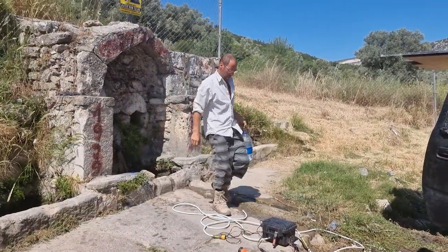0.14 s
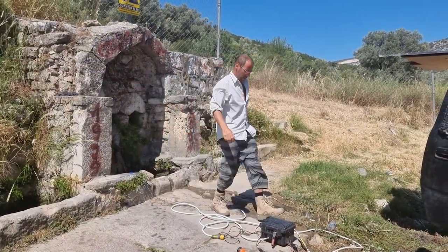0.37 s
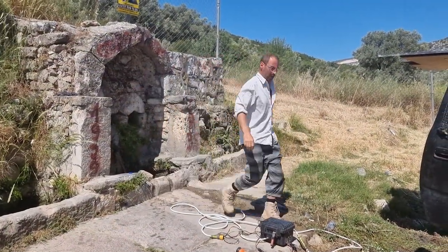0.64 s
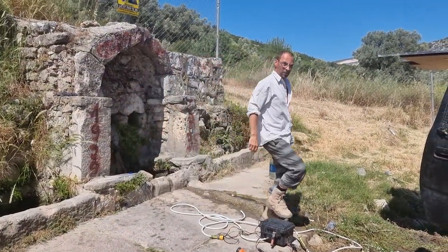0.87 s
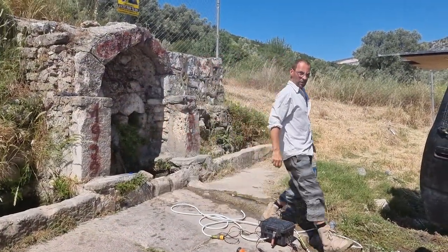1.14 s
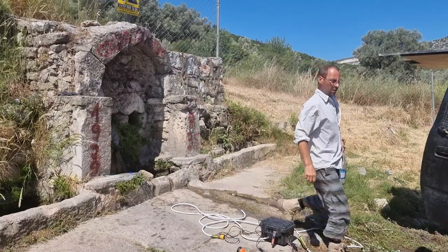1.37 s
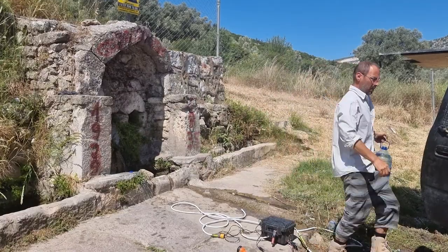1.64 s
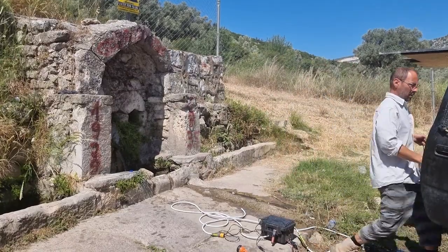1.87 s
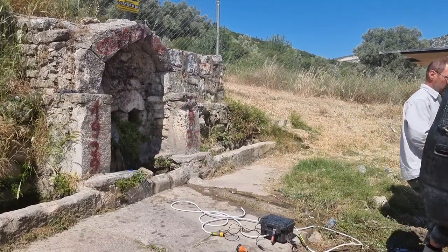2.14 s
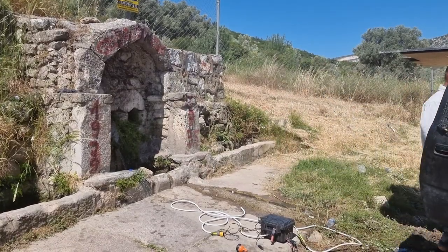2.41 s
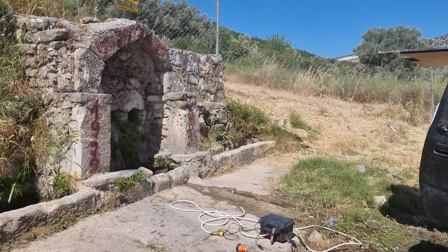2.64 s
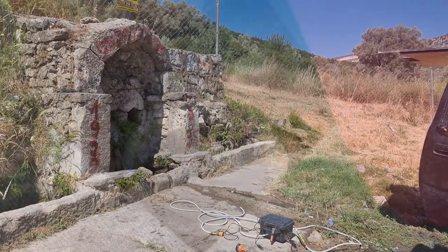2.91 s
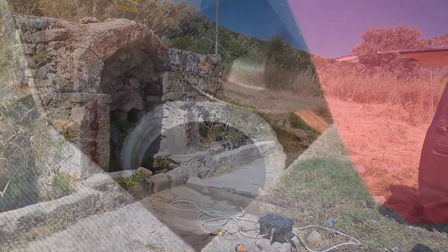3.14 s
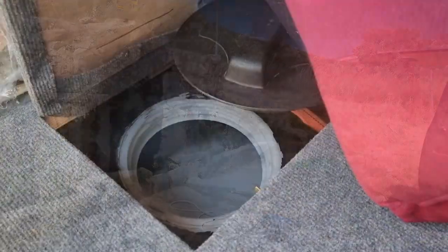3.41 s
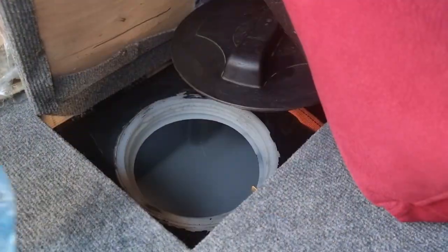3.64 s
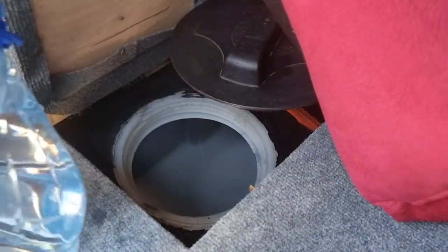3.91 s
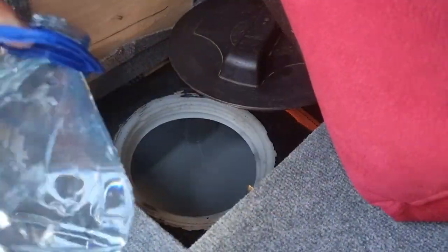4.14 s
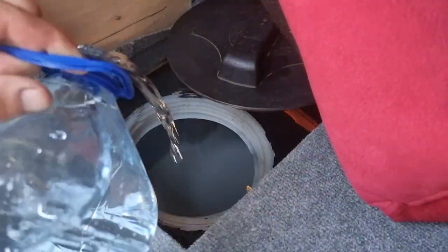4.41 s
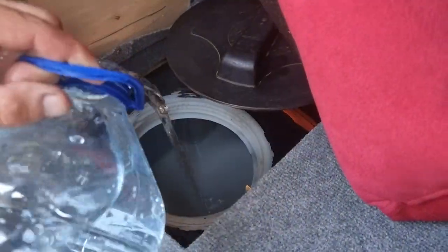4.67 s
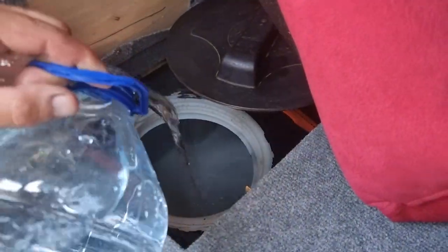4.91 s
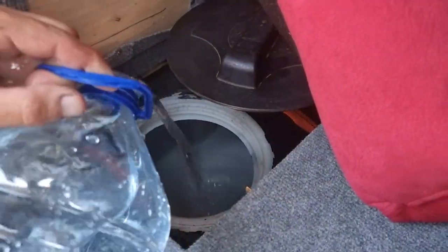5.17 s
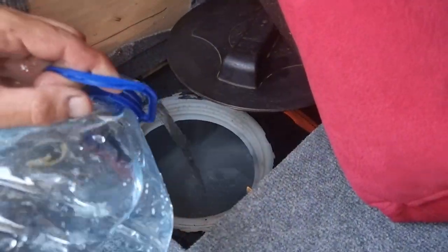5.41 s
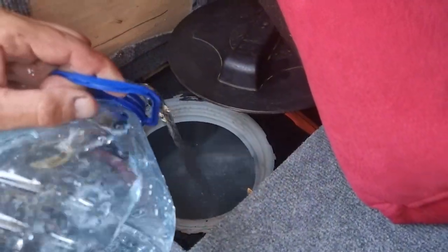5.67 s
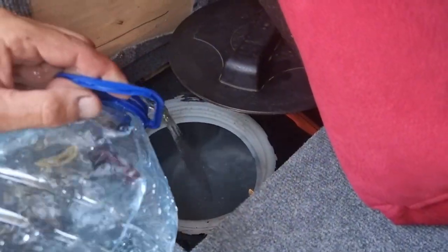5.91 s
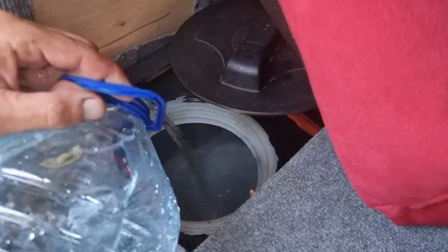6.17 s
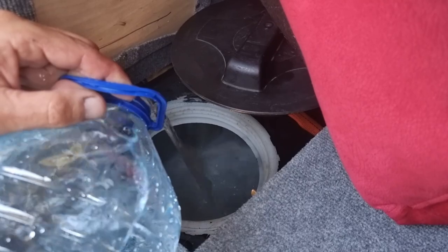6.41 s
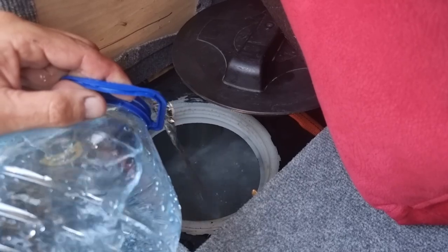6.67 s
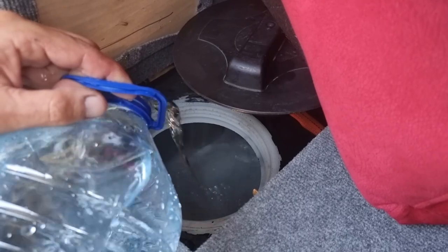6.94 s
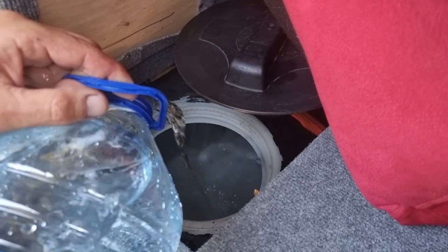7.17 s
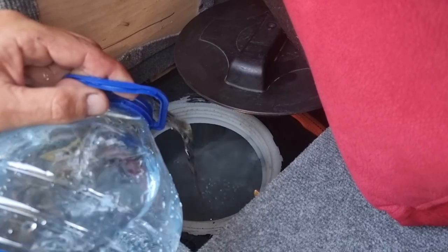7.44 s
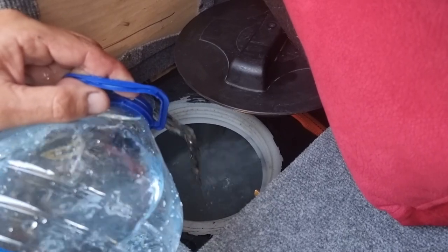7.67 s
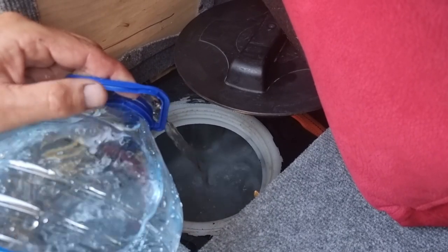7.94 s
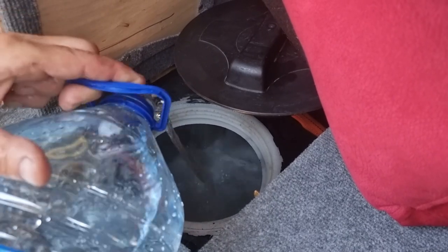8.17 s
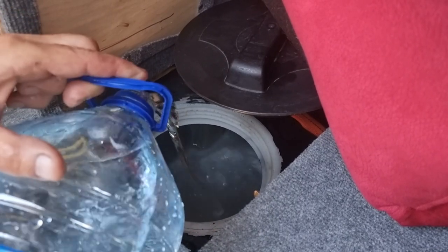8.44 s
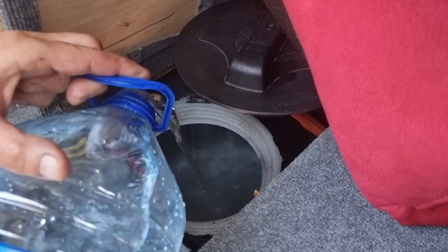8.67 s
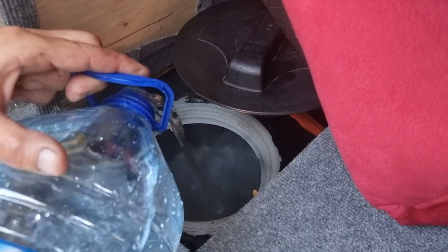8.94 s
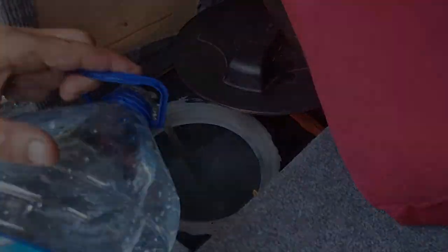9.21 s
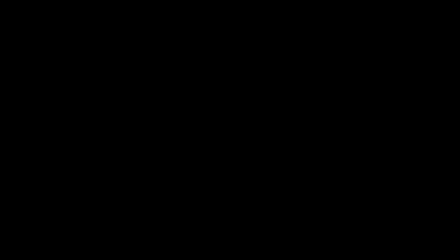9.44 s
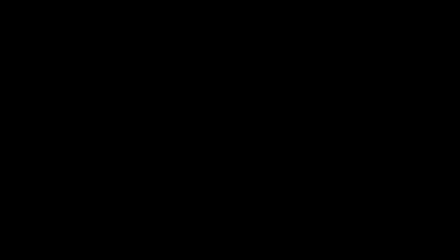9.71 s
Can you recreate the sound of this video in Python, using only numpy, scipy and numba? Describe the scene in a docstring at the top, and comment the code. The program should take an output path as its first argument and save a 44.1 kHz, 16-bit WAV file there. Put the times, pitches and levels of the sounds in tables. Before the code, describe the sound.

Outdoors, a thin spring trickles and bubbles into a stone trough while someone walks past with soft crunches and dull knocks; wind rumbles and thumps on the stereo microphone. After a blink of silence, close inside a van, a full plastic bottle sloshes and pops, then water gurgles in surges into a half-full tank, hissing, splashing and booming. One very loud plastic crack cuts through early in the pour.

```python
"""Inside a van, water plunges and pours in surges into a half-full tank: bubbles and churned noise ring its
modes, drops hiss above, and noise drives the booming, ringing air space. Before the pour a full plastic bottle
is lifted and sloshes; it pops then and during the pour, its buckling wall ringing in many damped sines. Ahead
of that, outdoors, a spring trickles (bubbles and noise) into a stone trough and someone walks past: dull knocks,
crunching noise. A short silence parts the places. Filtered noise is the wind on the two microphone ports."""
import sys
import numpy as np
from scipy import signal
from scipy.fft import rfft, irfft
from scipy.io import wavfile
from scipy.ndimage import uniform_filter1d
from numba import njit

SR = 44100
rng = np.random.default_rng(int(sys.argv[2]) if len(sys.argv) > 2 else 0)


def persist_wave(psi):
    """Save psi, clipped to +-1, as 16-bit WAV."""
    counts = np.round(np.clip(psi, -1, 1) * 32767).astype(np.int16)
    wavfile.write(sys.argv[1], SR, np.atleast_2d(counts).T)


def volts_from_db(level):
    """Convert decibel levels to linear amplitude ratios."""
    exponent = np.asarray(level, float) / 20
    return 10 ** exponent


N = 433062
PORTS = np.array([[1], [-1]])  # left, right
BREAK_START_S, BREAK_END_S = 3.583, 3.597  # silence between trough and van
POUR_START_S = 4.55

# Strength of the water in each place: time_s, froth_level_db
SPRING_FLOW = [(0, -55.5), (.85, -57.5), (1.05, -56.5), (1.25, -61.5), (1.35, -53.5), (1.6, -56.5),
               (2.75, -57), (2.95, -54), (3.58, -56)]
SLOSH_FLOW = [(3.6, -55.5), (3.8, -56), (4.2, -56.5), (4.55, -56)]
POUR_FLOW = [(4.55, -49), (4.64, -48.5), (4.7, -48), (4.84, -43), (5.1, -46), (5.3, -45), (5.95, -46.5),
             (6.2, -46), (7.0, -45.5), (7.55, -48), (8.2, -46), (8.55, -43.5), (9.0, -47.5), (9.82, -43.5)]
# Spectral shapes of froth and spray, overall level set elsewhere: frequency_hz, density_db (per Hz)
SPRING_FROTH = [(140, -53), (240, -13), (280, 3), (367, -3), (493, -15.5), (1150, -5.5), (1270, -11),
                (1880, -9.5), (7000, -18), (9100, -64), (15400, -120)]
SPRING_SPRAY = [(2940, 8), (5000, -7), (7100, -1), (11700, -9.5), (12900, -2.5), (14600, -5.5), (16000, -2)]
SLOSH_FROTH = [(140, -49), (240, 0), (382, -14), (592, -5), (971, -14.5), (1060, -8), (1710, -10),
               (2300, -10.5), (7000, -24.5), (9100, -52), (15400, -120)]
SLOSH_SPRAY = [(2940, -8), (5000, -10), (6730, -19), (7490, -15), (12400, -13), (16000, -11)]
POUR_FROTH = [(140, -42), (240, -0.5), (388, -13.5), (627, -8), (940, -11), (1070, -8.5), (1290, -8.5),
              (2050, 0.5), (3100, -3), (3800, -5), (4450, -11.5), (5510, -13.5), (7000, -16), (9100, -10),
              (15400, -120)]
POUR_SPRAY = [(2940, -55), (4500, -5.5), (5000, 5.5), (5610, 6), (7350, -2.5), (9970, 1), (11100, 0),
              (12600, 1.5), (15600, 0.5)]
# Resonances of the vessels on the scale of the froth shapes: centre_hz, width_hz, peak_db
TROUGH = [(380, 120, -6.5), (1160, 140, -6.5), (1764, 490, -2), (2750, 590, -6.5), (3500, 170, 0.5),
          (3950, 320, -7)]
BOTTLE = [(2050, 270, -14), (2800, 210, -9)]
TANK = [(592, 19, -20), (1073, 45, -2.5), (1365, 44, -2.5), (1550, 87, -7), (1990, 28, 2), (2370, 38, 6),
        (2607, 107, 4.5), (3390, 14.5, 5)]
# Thin note of the air above the water: centre_hz, width_hz, level_db (over froth)
TANK_NOTE = 1095, 25, -16.5
# Faint floor beneath that note: frequency_hz, density_db (per Hz)
NOTE_FLOOR = [(100, -54), (10000, -66)]
# Lowest air modes of the tank: centre_hz, width_hz, peak_db
TANK_AIR = [(80, 24, 2.5), (142, 25.6, 2.5), (211, 25.5, -2.5)]
# Spectral shape of the boom under those modes: frequency_hz, density_db (per Hz)
TANK_LOW = [(15, -22), (25, -4.5), (71, -1), (140, -7.5), (214, -10), (253, -14), (420, -17), (550, -17),
            (920, -120)]
# Spectral shapes of the wind's throb and rougher flutter: frequency_hz, density_db (per Hz)
RUMBLE = [(12, -7), (20, -8.5), (47, 1.5), (80, -0.5), (100, -4.5), (160, -34.5), (210, -43), (350, -120)]
FLUTTER = [(71, -35), (120, 7.5), (151, 2), (269, -9.5), (420, -21.5), (600, -39.5), (780, -82),
           (1320, -120)]
# Spectral shapes of a short noise burst's body and spray: frequency_hz, density_db (per Hz)
BURST_BODY = [(600, -49), (1200, 1.5), (2500, 7.5), (4000, 10.0), (6000, -36)]
BURST_SPRAY = [(2500, -7), (4500, 9.5), (6500, 11.0), (8000, 1.0), (15500, 5.5)]
# Borders between pitch ranges that swell on their own: frequency_hz
PATCH_EDGES = [600, 1300, 2200, 3400, 4800, 7000, 9500, 12500]
# Damping of the bottle wall's dense modes: frequency_hz, t60_s
WALL = [(120, 0.035), (300, 0.16), (700, 0.073), (1500, 0.042), (3500, 0.016), (8000, 0.034)]
# Wall buckles: start_s, peak_db (left port), pitch_hz, spread_octaves, thump_db (of the load)
POPS = [(3.599, -29.5, 326, 0.97, -15), (3.7497, -29.5, 2260, 0.79, -51), (3.766, -34.5, 900, 1.5, -40),
        (4.2208, -8.5, 1270, 1.4, -6), (4.331, -41, 6540, 0.84, -53), (4.374, -37, 5000, 0.78, -27),
        (4.4431, -23.5, 1880, 0.34, -9), (4.4452, -15, 1180, 0.55, -11), (4.5069, -29, 6030, 0.88, -33),
        (4.515, -32.5, 700, 0.94, -6), (5.3585, 2, 1650, 1.5, -20.5), (8.7495, -12, 1090, 0.99, -9),
        (8.7545, -30.5, 1300, 1.1, -28), (8.7622, -19.5, 1580, 0.61, -17)]
# Dull knocks as the walker steps and sets the load down: start_s, level_db, pitch_hz, t60_s
KNOCKS = [(0.931, -44, 315, 0.063), (1.312, -41.5, 177, 0.081), (3.001, -36.5, 383, 0.11),
          (3.054, -40, 145, 0.071)]
# Loud bubbles, each a tight cluster of rings; those near 1.1 kHz are swells of the tank's note:
# start_s, strength_db (before sharing between ports), pitch_hz
GURGLES = [(0.128, -33.5, 1550), (0.225, -34, 1610), (0.76, -37, 1870), (1.09, -41, 764), (3.41, -37, 2080),
           (3.465, -37, 2060), (3.49, -40, 2050), (7.656, -28, 10000), (0.3894, -35, 3720),
           (0.673, -29, 1720), (0.72, -35, 1350), (0.807, -33.5, 1030), (0.9146, -30.5, 2580),
           (0.92, -38, 740), (1.197, -30, 1890), (1.215, -34, 1840), (1.3224, -31, 1500),
           (1.9005, -39.5, 940), (2.1394, -27.5, 3500), (3.0984, -24, 3970), (3.5394, -34, 2950),
           (3.818, -43, 2100), (3.83, -39, 1970), (3.92, -39, 2500), (3.9394, -37, 2310), (3.97, -37, 2800),
           (4.153, -38, 1930), (4.1914, -29, 2800), (4.6498, -21, 2700), (4.81, -17, 3400),
           (4.85, -16, 3360), (5.055, -33, 2060), (5.1415, -23, 2130), (5.065, -31.5, 1095),
           (5.45, -33, 1080), (5.53, -31.5, 1090), (8.6, -30, 1120), (9.765, -34, 1090),
           (5.7329, -22, 1990), (5.89, -23, 3420), (6.088, -26, 2370), (6.432, -23, 3500),
           (6.46, -26, 2180), (6.58, -25, 2150), (6.7178, -19, 2090), (6.728, -27, 1090),
           (6.8646, -24, 2640), (7.0284, -26, 2060), (7.436, -24, 2400), (7.7114, -22, 2320),
           (7.8314, -24, 2520), (7.868, -25, 2450), (7.93, -30, 1950), (8.0501, -23, 2240),
           (8.1147, -25, 2500), (8.466, -28, 5440), (8.53, -21, 2100), (8.543, -25, 2630),
           (8.792, -23, 2080), (8.855, -24, 2750), (8.963, -31, 1930), (9.128, -24, 2550),
           (9.5205, -23, 2570), (9.574, -22, 2610)]
# Short noise bursts: water landing, and the crunch of steps near 1.31 and 1.85 s:
# start_s, body_peak_db, spray_rms_db
BURSTS = [(0.056, -41, -61), (0.127, -40.5, -67), (0.3936, -41, -59), (0.803, -44, -50), (0.9143, -50, -56),
          (1.025, -47, -65), (1.198, -47.5, -74), (1.309, -45, -51.5), (1.484, -42, -57.5),
          (1.854, -58, -52.5), (1.9, -42.5, -60), (2.0748, -45, -50.5), (2.366, -40.5, -56),
          (2.8414, -46, -67), (3.047, -47, -53), (3.0975, -39.5, -73), (3.21, -41, -67),
          (3.383, -45.5, -59), (3.539, -43, -69), (4.648, -38, -40), (4.711, -38, -34.5), (4.8, -29, -47),
          (4.835, -30.5, -49), (5.438, -36, -39), (5.602, -51, -42), (5.971, -30.5, -47), (6.327, -48, -47),
          (6.404, -52, -41), (6.684, -51, -36), (6.705, -53, -38.5), (6.7894, -46, -49), (7.0694, -52, -48),
          (7.785, -54, -45), (7.832, -33, -59), (8.212, -46, -42.5), (7.9995, -51, -44), (8.537, -37, -42),
          (8.854, -56, -88), (8.908, -58, -38), (8.963, -38, -47), (9.06, -42, -45), (8.765, -39, -58),
          (9.118, -42, -64), (9.159, -44, -48), (9.37, -38, -39), (9.521, -42, -45), (9.612, -47, -48),
          (9.7255, -51, -39.5)]
# Wind on the ports: time_s, rumble_db, left_minus_right_db
WIND = [(0, -41.5, 4), (.2, -37, -2.5), (.5, -49.5, 12), (.75, -70, 11), (1.35, -62, 1), (1.47, -51.5, 3),
        (1.75, -47, -8), (1.95, -38, -9), (2.1, -40.5, -10), (2.3, -39, 7), (2.52, -31.5, -8),
        (2.59, -41, -19), (2.68, -27, -1.5), (2.82, -32, -4), (2.92, -50, -6), (3.05, -48, -11),
        (3.2, -51, -10), (3.45, -64, -5), (3.58, -78, -23), (5.3, -80, -12), (5.7, -53.5, 12),
        (6.3, -62, 6), (7.0, -81, -8), (8.95, -85, -8), (9.2, -53.5, 11), (9.82, -50, 5)]
# Eddies that hit the ports: centre_s, left_db, right_db, flutter_db (over rumble)
BUFFETS = [(.11, -41, -48, -33), (.22, -41, -29, -17), (.36, -33, -40, -12), (.53, -37, -36, -32),
           (1.5, -48, -29, -23), (1.568, -37, -22.5, -15), (1.642, -83, -28.5, -13), (1.835, -51, -40, 10),
           (1.95, -47, -46, 3.5), (2.182, -29, -37, 1), (2.24, -40, -37.5, 8), (2.297, -16, -21.5, -11),
           (2.39, -36, -55, -17), (2.475, -30, -28, -7), (2.655, -43, -21, -28), (2.973, -39, -27, -18),
           (3.11, -41, -29.5, -17), (3.19, -48, -33, -12), (3.3, -53, -42, -21)]
# Stream swells with each gulp of air, or thins: centre_s, half_length_s, spray_lift_db, boom_lift_db
SURGES = [(4.705, 0.059, 7, 7.5), (4.9, 0.042, 6.5, 1), (5.01, 0.053, 5.5, 6.5), (5.306, 0.022, -13, -12),
          (5.393, 0.094, 3.5, 12.5), (5.639, 0.015, 9, 7), (5.92, 0.057, 6.5, 5), (6.424, 0.044, 6.5, 1),
          (6.69, 0.052, 4.5, 5.5), (6.813, 0.023, 8, 7.5), (7.212, 0.1, 3, 3.5), (7.533, 0.025, 0.5, 3),
          (7.726, 0.028, 9.5, -1), (7.956, 0.044, 1.5, -3), (8.35, 0.039, 5.5, 3.5), (8.557, 0.16, 0.5, 3),
          (8.93, 0.028, 2, -17), (9.017, 0.037, 0, -10), (9.412, 0.037, 6, 7), (9.478, 0.014, -1, 0),
          (9.773, 0.03, 6.5, 0)]
# Stream breaks for a moment, most often quieter: centre_s, level_change_db
LULLS = [(4.62, -2), (5.67, -3), (6.19, -1), (6.665, -3), (6.94, -4.5), (7.4, 0.5), (7.67, 2), (8.25, -3),
         (8.42, -5.5), (8.7, -0.5), (9.49, -7), (9.69, -4.5)]
# Solid slugs of water striking the pool: start_s, rms_db, length_s
PLUNGES = [(4.696, -36, 0.043), (9.117, -47.5, 0.029)]
# Tank modes rung by those slugs: pitch_hz, level_db, t60_s
TANK_MODES = [(212, -7, 0.05), (330, -8, 0.19), (517, -11, 0.042), (635, 2, 0.018), (816, -8, 0.07),
              (1090, -2, 0.042), (1280, -25, 0.071), (2194, -16, 0.033)]


def table(rows):
    """Columns of a curve at every sample."""
    s, *columns = np.transpose(rows)
    return [np.interp(np.arange(N) / SR, s, c) for c in columns]


def unit(x):
    """Rms 1."""
    return x / np.sqrt(np.mean(x ** 2))


def colour(x, points, peaks=(), under_db=0):
    """Causal minimum-phase filter: a smooth spectrum with resonances standing on it; rms 1."""
    n = 2 ** 14
    f = np.maximum(np.arange(n // 2 + 1) * SR / n, 1)
    hz, db = np.transpose(points)
    power = volts_from_db(2 * (np.interp(np.log(f), np.log(hz), db) + under_db))
    for centre_hz, width_hz, peak_db in peaks:
        power = power + volts_from_db(2 * peak_db) / (1 + (2 * (f - centre_hz) / width_hz) ** 2) ** 2
    # folding the cepstrum forward puts the energy as early as possible
    cepstrum = irfft(np.log(power + 1e-9) / 2, n)
    cepstrum[1:n // 2] *= 2
    cepstrum[n // 2 + 1:] = 0
    response = irfft(np.exp(rfft(cepstrum)), n)[None, :n // 2]
    return unit(signal.oaconvolve(x, response, axes=1)[:, :N])


def walk(rate, channels=1):
    """Random levels held 1 / rate s and slewed twice; rms 1."""
    k = int(SR / rate)
    steps = np.repeat(rng.standard_normal((channels, N // 100))[:, :N // k + 1], k, axis=1)
    return unit(uniform_filter1d(uniform_filter1d(steps, k), k)[:, :N])


def bumps(times, widths, heights):
    """A sum of bell-shaped swells."""
    t = np.arange(0, N, 32) / SR
    bells = np.exp(-.5 * ((t - np.c_[times]) / np.c_[widths]) ** 2)
    return np.interp(np.arange(N) / SR, t, heights @ bells)


def fading(hits, fall_s):
    """Each hit jumps up and dies away exponentially."""
    return signal.lfilter([1], [1, -np.exp(-1 / (fall_s * SR))], hits)


def pair(shared, own, likeness, lag_s):
    """Two ports: a shared part that reaches the right one later, and a part of each one's own."""
    f = np.arange(N // 2 + 1) * SR / N
    # half the lag early at the left port, half late at the right
    lagged = irfft(rfft(shared) * np.exp(-1j * np.pi * f * lag_s * -PORTS), N)
    likeness = np.clip(likeness, 0, 1)
    return np.sqrt(likeness) * lagged + np.sqrt(1 - likeness) * own


def patchy(x, depth_db, rate):
    """Neighbouring pitch ranges swell and fade on their own."""
    swells = volts_from_db(depth_db * walk(rate, channels=len(PATCH_EDGES) + 1))
    out = 0
    for hz, swell in zip(PATCH_EDGES, swells):
        low = signal.sosfiltfilt(signal.butter(2, hz, fs=SR, output="sos"), x)
        out = out + swell * low
        x = x - low
    return out + swells[-1] * x


def wind():
    """Eddies push each port on its own: a wavering low throb and a rougher flutter."""
    eddy_s, between_flutter_db = 0.013, -17.5  # half width of an eddy; flutter over rumble between them
    rumble_db, pan_db = table(WIND)
    s, left_db, right_db, flutter_db = np.transpose(BUFFETS)
    rumble = colour(rng.standard_normal((2, N)), RUMBLE)
    # one eddy at a time: the throb keeps a nearly even strength within a gust
    rumble = unit(rumble / (np.abs(signal.hilbert(rumble)) + 1.9))
    flutter = colour(rng.standard_normal((2, N)), FLUTTER) * volts_from_db(1.6 * walk(29.3, channels=2))
    steady = np.sqrt(2) * volts_from_db(rumble_db + pan_db * PORTS / 2 + 4.16 * walk(13, channels=2))

    def eddies(over_db):
        """Swells of the eddies at each port."""
        return np.array([bumps(s, eddy_s + 0 * s, volts_from_db(db + over_db)) for db in (left_db, right_db)])

    flutter_gain = volts_from_db(between_flutter_db) * steady + eddies(flutter_db)
    return (steady + eddies(0)) * rumble + flutter_gain * flutter


def knocks():
    """Each a single dull damped ring with a soft start, equal at both ports."""
    out, t = np.zeros(N), np.arange(SR // 4) / SR
    for s, level_db, hz, t60 in KNOCKS:
        i = int(s * SR)
        tone = np.sin(2 * np.pi * hz * t) * 1000 ** (-t / t60)
        out[i:i + len(t)] += volts_from_db(level_db) * tone * (1 - np.exp(-t / 0.00059))
    return out


@njit
def rings(start, hz, cycles, glide, rise, size, n):
    """Damped sines that swell softly and rise in pitch as they fade."""
    out = np.zeros(n)
    for k in range(len(start)):
        z, w, late = size[k] + 0j, 2 * np.pi * hz[k] / SR, 1.
        life = cycles[k] * SR / hz[k]  # samples
        p, turn, fade = np.exp(1j * w - 1 / life), np.exp(1j * w * glide[k] / life), np.exp(-1 / (rise * life))
        for i in range(start[k], min(start[k] + int(4 * life), n)):
            out[i] += z.imag * (1 - late)
            z, p, late = z * p, p * turn, late * fade
    return out


def bubbles(span, cycles, spread_db, patchy_db, count, low_hz=301.5, high_hz=7045.0):
    """Ringing air pockets of all sizes, count a second; like sizes come in swarms, most are faint."""
    when, pitch, life, size, glide = rng.random((int(count * (span[1] - span[0])), 5)).T
    start = (SR * (span[0] + when * (span[1] - span[0]))).astype(int)
    swarm = walk(25, channels=9)[(9 * pitch).astype(int), start]
    hz = low_hz * (high_hz / low_hz) ** pitch
    size = volts_from_db(spread_db * np.minimum(-np.log(1 - size), 3) + patchy_db * swarm)
    cycles = cycles * np.sqrt(hz / 1000) * (0.56 + life)
    out = rings(start, hz, cycles, 0.0351 * glide, 0.23, size * hz ** 0.5, N)
    return out / np.std(out[start.min():start.max()])


def lulls():
    """Level changes in dB where the stream breaks."""
    s, db = np.transpose(LULLS)
    return bumps(s, 0.025 + 0 * s, db)


def water(flow, spray_db, surges, froth, spray, resonances, cycles, bubble_share, spread_db, patchy_db,
          flicker_db, likeness, lag_s, pan_db, count):
    """Bubbles and churned water ring the vessel; fine drops hiss above them."""
    froth_db, = table(flow)
    if surges:
        s, width, lift_db, _ = np.transpose(surges)
        spray_db = spray_db + bumps(s, width, lift_db)
        # froth follows a surge weakly and late
        froth_db = froth_db + 0.1 * bumps(s + 0.0088, width, lift_db) + lulls()
    span = flow[0][0], min(flow[-1][0], (N - 1) / SR)
    inside = slice(int(span[0] * SR), int(span[1] * SR))

    share = np.clip(bubble_share, 0, 1)
    air = np.array([bubbles(span, cycles, spread_db, patchy_db, count) for _ in range(3)])
    churn = np.sqrt(share) * air + np.sqrt(1 - share) * rng.standard_normal((3, N))
    # each impact of the broken stream shakes froth and spray together
    beat = volts_from_db(flicker_db * walk(30))
    spatters_per_s, spatter_s = 14.0, 0.044  # small lumps landing at random; their fall time
    lumps = (rng.random(N) < spatters_per_s / SR) * (.5 + rng.random(N))
    spatter = fading(lumps, spatter_s)
    beat = beat * (1 + 0.34 * spatter)
    body = colour(pair(churn[0], churn[1:], likeness, lag_s) * beat, froth, resonances, under_db=-1.0)

    drops = np.array([bubbles(span, 16.3, 1.5, 3.4, count, low_hz=3992.0, high_hz=15480.0) for _ in range(2)])
    hiss = rng.standard_normal((2, N)) * volts_from_db(3.9 * walk(300, channels=2))
    # single drops spit sharply, each at one port
    spits_per_s, spit_s = 17, 0.0032  # rate at each port; fall time
    spits = (rng.random((2, N)) < spits_per_s / SR) * rng.exponential(size=(2, N))
    hiss = hiss * (1 + 0.32 * fading(spits, spit_s))
    mist = colour((0.92 * drops + hiss) * beat * (1 + 0.28 * spatter), spray)

    # levels hold for the mean of two mostly unrelated ports
    gain = np.sqrt(2) * volts_from_db(froth_db + pan_db * PORTS / 2)
    return gain * (body / np.std(body[:, inside]) + volts_from_db(spray_db) * mist)


def spring():
    """A trickle whose bubbles and spray ring the stone trough."""
    return water(SPRING_FLOW, -7, [], SPRING_FROTH, SPRING_SPRAY, TROUGH, cycles=16.6, bubble_share=0.48,
                 spread_db=3.2, patchy_db=3.3, flicker_db=1.0, likeness=0.36, lag_s=0.000094, pan_db=0.22,
                 count=600)


def slosh():
    """Water stirred in the lifted bottle, its bubbles ringing the bottle's resonances."""
    return water(SLOSH_FLOW, -10.5, [], SLOSH_FROTH, SLOSH_SPRAY, BOTTLE, cycles=9.9, bubble_share=0.45,
                 spread_db=4.8, patchy_db=2.8, flicker_db=0.67, likeness=0.43, lag_s=0.000443, pan_db=0.76,
                 count=700)


def pops():
    """A snap and a short crackle ring the wall's dense modes; the load thumps after; left hears it first."""
    lag_s, lean_db = 0.00023, 4.5  # right port: later and quieter
    phase_turn, phase_scatter = 0.85, 1  # radians at the right port
    shadow_hz = 2830  # the right port hears the bottle round the body of the recorder
    crackle_cycles = 3.63  # the crackle's decay in cycles of its pitch
    belly_over_thump_db, belly_t60_s, belly_turn = 17.5, 0.034, 2.9  # right port trails by the turn, radians
    out, t = np.zeros((2, N)), np.arange(SR // 5) / SR
    late = np.maximum(t - lag_s, 0)
    wall_hz, wall_t60 = np.transpose(WALL)
    shadow = signal.butter(2, shadow_hz, fs=SR, output="sos")
    for s, peak_db, centre_hz, octaves, thump_db in POPS:
        nudge, strike, side = rng.standard_normal((3, 64, 1))
        hz = np.geomspace(100, 9000, len(nudge))[:, None] * (1 + 0.017 * nudge)
        t60 = np.interp(np.log(hz), np.log(wall_hz), wall_t60)
        snap = volts_from_db(-6.0 * np.abs(np.log2(hz / centre_hz) / octaves) ** 1.5)
        # the low modes are pushed slowly and out of step
        thump = volts_from_db(thump_db - 3.6 * np.log2(hz / 440) ** 2) * np.sign(nudge) * (1 - np.exp(-t / 0.0016))
        turn = (phase_turn + phase_scatter * side) * (1 - np.exp(-late * hz))
        waves = np.sin([2 * np.pi * hz * t, 2 * np.pi * hz * late - turn])
        modes = volts_from_db(2 * strike) * waves * 1000 ** (-t / t60)
        # a thin wall moves air poorly below the pitch of the snap
        thin = signal.butter(2, 0.7 * centre_hz, "high", fs=SR, output="sos")
        ring = signal.sosfilt(thin, (snap * modes).sum(axis=1)) + (thump * modes).sum(axis=1)

        # the bottle's belly note climbs as it empties
        belly_hz = 448 + 33 * (s - 4.2)
        belly = np.sin(2 * np.pi * belly_hz * np.array([t, late]) - belly_turn * (1 - PORTS) / 2)
        belly = belly * 1000 ** (-t / belly_t60_s) * (1 - np.exp(-t / 0.00082))
        ring = ring + volts_from_db(thump_db + belly_over_thump_db) * belly

        crackle_s = crackle_cycles / centre_hz
        crackle = rng.standard_normal(len(t)) * (rng.random(len(t)) < .04)
        crackle = crackle * np.exp(-t / max(crackle_s, 1e-3))
        crackle[0] = 1 + 0.0019 / max(crackle_s, .002)  # a short crackle means one clean snap
        push = np.convolve(crackle, np.hanning(7))[:len(t)]
        pop = signal.fftconvolve(ring, push[None])[:, :len(t)]
        pop[1] = signal.sosfilt(shadow, pop[1])
        pop *= volts_from_db(peak_db + lean_db * (PORTS - 1) / 2) / np.abs(pop).max(axis=1, keepdims=True)
        i = int(s * SR)
        out[:, i:i + len(t)] += pop
    return out


def noise_bursts():
    """Landing water and crunching steps, as bursts of noise: the level jumps up and dies away."""
    jump = np.zeros((2, 1, N))
    for s, body_db, spray_db in BURSTS:
        jump[:, 0, int(s * SR)] = volts_from_db(body_db) / 2, volts_from_db(spray_db)  # such noise peaks at twice its mean
    body, spray = fading(jump, 0.014)
    body = body * colour(rng.standard_normal((2, N)), BURST_BODY)
    return body + spray * colour(rng.standard_normal((2, N)), BURST_SPRAY)


def gurgles():
    """Loud bubbles and swells of the tank's note, each a tight cluster of four rings of nearly one pitch."""
    s, strength_db, hz = np.repeat(GURGLES, repeats=4, axis=0).T
    delay, detune = rng.random((len(s), 2)).T
    start = ((s + 0.02 * delay ** 2) * SR).astype(int)
    pitch_hz = hz * (0.972 + 0.072 * detune)
    out = rings(start, pitch_hz, 3.4 * np.sqrt(hz / 1000), 0.0072 + 0 * hz, 0.33, volts_from_db(strength_db), N)
    return pair(out, np.zeros((2, N)), 0.16, 0.0001)


def boom(pouring):
    """The falling water and the pops drive the tank's lowest air modes, alike at both ports, louder left."""
    over_froth_db, idle_db = -7, -70  # while pouring; before it
    jolt_db, jolt_share, jolt_rise_s, jolt_fall_s = -44, 0.37, 0.0092, 0.11  # each pop shakes the tank
    s, width, _, lift_db = np.transpose(SURGES)
    drive = pouring * volts_from_db(table(POUR_FLOW)[0] + over_froth_db + bumps(s, width, lift_db)) + volts_from_db(idle_db)
    t = np.arange(N) / SR
    for s, peak_db, _, _, thump_db in POPS:
        since = np.maximum(t - s, 0)
        jolt = np.minimum(since / jolt_rise_s, 1) * np.exp(-since / jolt_fall_s)
        drive = drive + volts_from_db(jolt_db + jolt_share * (peak_db + thump_db)) * jolt
    noise = rng.standard_normal((3, N)) * volts_from_db(1.4 * walk(15))
    low = colour(pair(noise[0], noise[1:], 0.96, 0.000097), TANK_LOW, TANK_AIR, under_db=1.5)
    return drive * volts_from_db(1.7 * PORTS) * low


def tank_note(pouring):
    """The air above the water sings one thin note, a narrow band of noise, while the stream runs."""
    hz, width, over_db = TANK_NOTE
    noise = rng.standard_normal((3, N)) * volts_from_db(4.3 * walk(14))
    note = colour(pair(noise[0], noise[1:], 0.9, 0.00024), NOTE_FLOOR, [(hz, width, 0)])
    return pouring * volts_from_db(table(POUR_FLOW)[0] + over_db + lulls() + 3.4 * PORTS) * note


def plunges():
    """A solid slug strikes the pool: a short rush of noise through the tank's modes."""
    out, t = np.zeros((2, N)), np.arange(SR // 5) / SR
    ring = sum(volts_from_db(db) * np.sin(2 * np.pi * hz * t) * 1000 ** (-t / t60) for hz, db, t60 in TANK_MODES)
    for s, db, length in PLUNGES:
        rush = rng.standard_normal((3, len(t))) * (t < length) * np.exp(-t / length)
        sound = signal.fftconvolve(rush[0] + 1.4 * rush[1:], ring[None])[:, :len(t)]
        i = int(s * SR)
        out[:, i:i + len(t)] += volts_from_db(db) * sound / np.std(sound[:, t < length])
    return out


def echo(x):
    """The tank's walls throw the splash about; each port hears its own dense, short tail."""
    wall_share, t60_s = 0.3, 0.09  # walls' share, as a power weight
    t = np.arange(SR // 8) / SR
    tails = rng.standard_normal((2, len(t))) * 1000 ** (-t / t60_s)
    modes = rfft(tails)
    # no broad pitch range is favoured, only fine peaks and dips
    tails = irfft(modes / np.sqrt(2 * uniform_filter1d(np.abs(modes) ** 2, size=30)), len(t))
    wet = signal.oaconvolve(x.sum(axis=0, keepdims=True), tails, axes=1)[:, :N]
    share = np.clip(wall_share, 0, 1)
    return np.sqrt(1 - share) * x + np.sqrt(share) * wet


def pour():
    """The surging stream churns air into the tank's water, and the tank's walls echo it."""
    stream = water(POUR_FLOW, -8, SURGES, POUR_FROTH, POUR_SPRAY, TANK, cycles=14.2, bubble_share=0.56,
                   spread_db=1.34, patchy_db=2.0, flicker_db=0.84, likeness=0.26, lag_s=0.00017, pan_db=2.3,
                   count=1700)
    return echo(stream)


def scene():
    """The spring outdoors, a moment of silence, then the van."""
    t = np.arange(N) / SR
    pouring = np.clip((t - POUR_START_S) / 0.053, 0, 1)
    outdoors, indoors = t < BREAK_START_S, t >= BREAK_END_S
    trough_water = spring()
    van_water = (1 - pouring) * slosh() + pouring * pour()
    flowing = patchy(np.where(indoors, van_water, trough_water), 2.16, 24)
    everywhere = flowing + noise_bursts() + gurgles() + wind()
    van = boom(pouring) + tank_note(pouring) + plunges() + pops()
    return (outdoors | indoors) * everywhere + outdoors * knocks() + indoors * van


def band_limit(x):
    """A steep low-pass at the top of the band."""
    return signal.sosfilt(signal.butter(12, 16620, fs=SR, output="sos"), x)


def record(dry):
    """The microphones round the loudest peak and drop the deepest bass and the top."""
    ceiling = 1.25
    rounded = ceiling * np.tanh(dry / ceiling)
    bass_cut = signal.butter(2, 41, "high", fs=SR, output="sos")
    top_cut = signal.ellip(8, .2, 60, 15850, fs=SR, output="sos")
    mix = signal.sosfilt(np.vstack([bass_cut, top_cut]), rounded)
    return band_limit(mix)


dry = scene()
out = record(dry)
persist_wave(out)
```